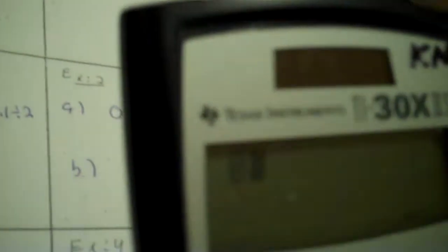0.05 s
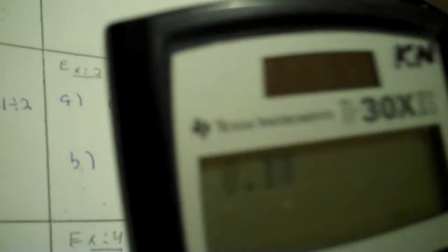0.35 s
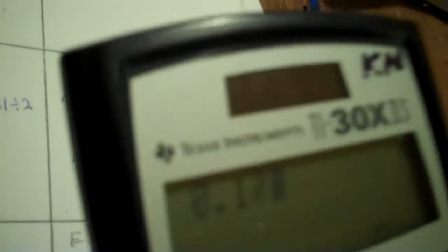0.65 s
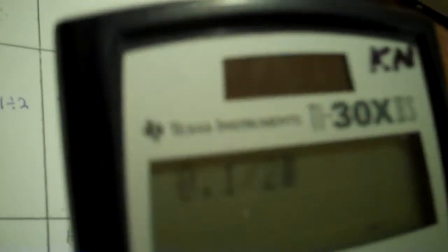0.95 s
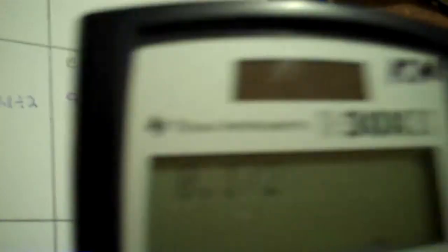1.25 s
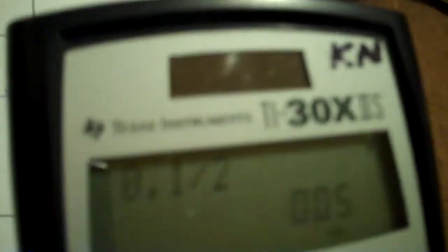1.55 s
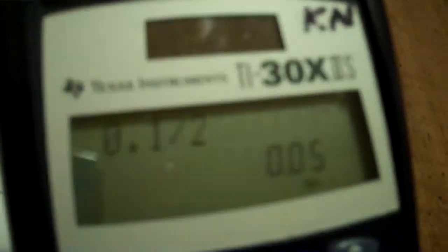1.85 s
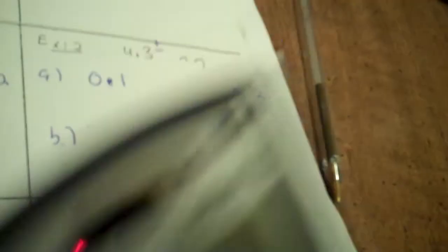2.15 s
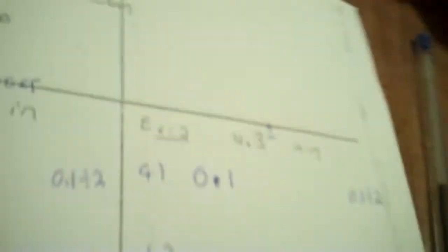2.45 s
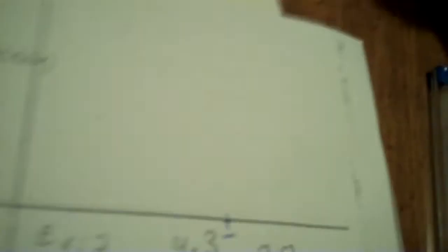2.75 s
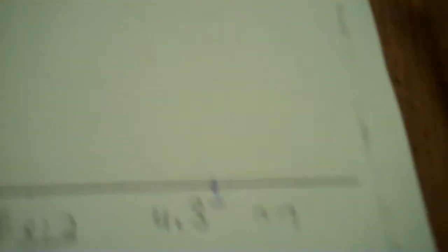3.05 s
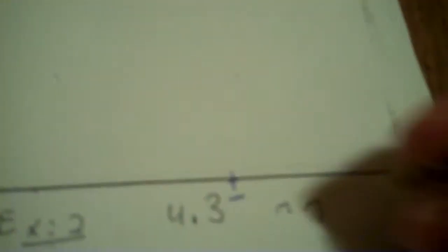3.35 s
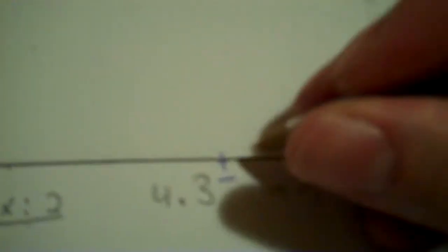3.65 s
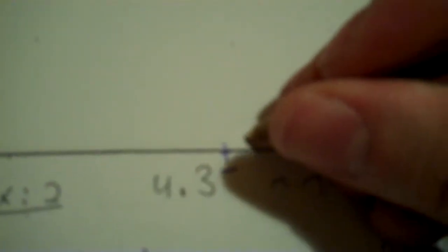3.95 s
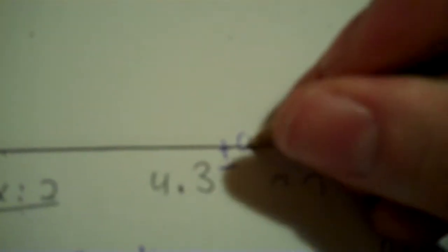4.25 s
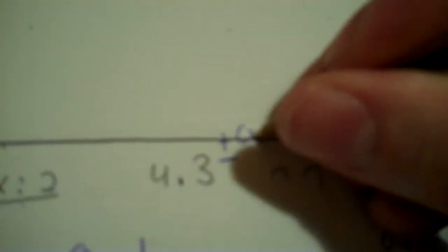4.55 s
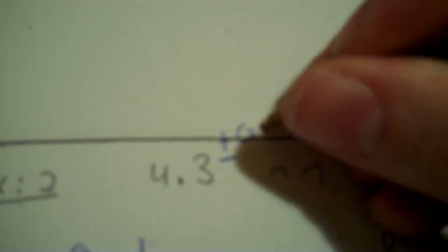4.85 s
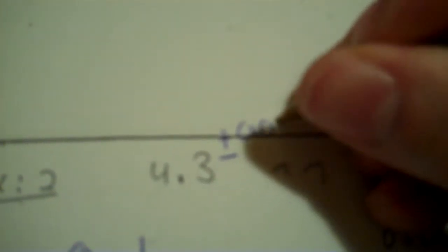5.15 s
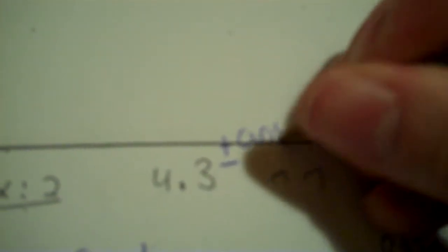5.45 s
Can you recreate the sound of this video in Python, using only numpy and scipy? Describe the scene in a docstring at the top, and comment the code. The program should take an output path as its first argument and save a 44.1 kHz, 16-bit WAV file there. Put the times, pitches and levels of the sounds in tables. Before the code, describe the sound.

Close to the microphone in a quiet room, fingers tap calculator keys with small, crisp clicks. Then comes the loudest sound: the hard plastic case lands on a wooden desk, rattling edge by edge with a thump that briefly overloads the microphone. Lighter knocks and ticks of a pen being handled follow, with a hand brushing paper, and finally the faint taps, scratches and thin squeak of writing.

```python
"""Plastic calculator keys click, close to the two microphone ports of a small camera in a quiet room.
Each key snaps and meets its stop. Then the calculator drops on the wooden desk: the hollow case
clatters edge by edge, the desk top rings and the loudest blows overload the microphone. A ballpoint
pen is picked up, a hand slides over the paper, and the tip ticks, scratches and sings as it writes."""
import sys
import numpy as np
from scipy import signal
from scipy.fft import rfft, irfft
from scipy.io import wavfile
from scipy.ndimage import uniform_filter1d

SR = 44100
rng = np.random.default_rng(int(sys.argv[2]) if len(sys.argv) > 2 else 0)


def store_wav(level_fs):
    """Save 16-bit WAV to argv[1]."""
    pcm = np.round(np.clip(np.atleast_2d(level_fs), -1, 1) * 32767)
    wavfile.write(sys.argv[1], SR, pcm.T.astype(np.int16))


N = 246449
TIME = np.arange(N) / SR
EDGE_HZ = 14450  # highest treble in the sound
LEAD = 48  # samples of padding before each click

# Small plastic parts heard close up. Each row: frequency in Hz, left gain in dB, right gain in dB.
PLASTIC_COLOUR = [(300, -25, -38), (810, -5, 2.5), (1330, 5.5, -0.5), (1580, -9.5, -0.5), (2400, 4.5, 6),
                  (3370, -2.5, 0), (4230, -1, -0.5), (5200, -2, -4), (6640, -2.5, -9.5), (7680, 2, -27),
                  (9400, -14.5, -28), (11800, -20, -39), (15600, -31, -13)]
# Something hard dragged over desk or paper. Each row: frequency in Hz, gain in dB.
DRAG_SPECTRUM = [(470, -40), (800, -18), (1680, -7), (2160, -3.5), (3800, 1), (6130, -6), (7600, -5),
                 (8370, -12.5), (9660, -19), (14000, -30)]


def amp(db):
    """Decibels to gain."""
    return 10 ** (np.asarray(db) / 20)


def unit(x):
    """Scales to rms 1."""
    return x / np.sqrt(np.mean(x ** 2) + 1e-20)


def read(points, hz, axis=1):
    """One column of a spectrum table, interpolated on a log-frequency axis."""
    table = np.array(points, float)
    return np.interp(np.log(hz + 1), np.log(table[:, 0] + 1), table[:, axis])


def sides(db):
    """Left and right gains that put the left port db above the right."""
    return amp(np.array([[.5], [-.5]]) * db)


def add(mix, s, sound):
    """Adds a stereo sound at s seconds."""
    part = mix[:, round(s * SR):][:, :sound.shape[1]]
    part += sound[:, :part.shape[1]]


def causal(db):
    """Response with the given gains that rings only after its cause."""
    log_gain = np.log(amp(np.concatenate([db, db[..., -2:0:-1]], -1)))
    return np.exp(np.conj(signal.hilbert(log_gain)))[..., :db.shape[-1]]


def noise(colour, same, balance_db=0):
    """Coloured stereo noise of rms 1; same is the correlation between the ports."""
    hz = np.fft.rfftfreq(N, 1 / SR)
    left, other = rfft(rng.standard_normal((2, N)))
    same = np.clip(same, -1, 1)
    pair = np.array([left, same * left + np.sqrt(1 - same ** 2) * other])
    return unit(irfft(pair * amp(read(colour, hz)) * sides(balance_db) * (hz < EDGE_HZ), N))


def chatter(decay, apart, size=4096, rise=0.0003, snap=2.5):
    """Spectrum of a sharp snap and its tiny rebounds; apart sets how much the two ports differ."""
    t = np.arange(size) / SR
    shared, own = np.split(rng.standard_normal((3, size)), [1])
    fade = np.exp(-t / max(decay, 1e-4)) * (1 - np.exp(-t / rise))
    own_share = np.minimum(apart * np.fft.rfftfreq(size, 1 / SR) / 4000, 1)
    spectrum = snap + rfft(shared * fade) + own_share * rfft(own * fade)
    # rebounds carry about equal energy in every broad band
    band_power = uniform_filter1d(abs(spectrum) ** 2, size=80, axis=1)
    return spectrum * causal(-10 * np.log10(band_power))


def blow(colour, apart, db, bass_db, treble_db, decay, spot_hz=None, spot_db=3.5, size=4096):
    """One contact coloured by the object; db is its level with the energy taken over 3 ms."""
    hz = np.fft.rfftfreq(size, 1 / SR)
    shape_db = np.array([read(colour, hz, axis=1), read(colour, hz, axis=2)])
    shape_db += read([(1200, bass_db), (3500, 0), (9000, treble_db)], hz)
    if spot_hz:  # the struck spot favours one resonance, 0.13 octaves wide
        shape_db += spot_db * np.exp(-(np.log2((hz + 1) / spot_hz) / 0.13) ** 2)
    shape_db -= 10 * np.log10(1 + (colour[0][0] / (hz + 10)) ** 2)  # a small object radiates little bass
    sound = irfft(chatter(decay, apart) * causal(shape_db))
    sound = np.roll(sound, LEAD, axis=1)[:, :size // 2]
    # one gain for both ports: the left hears more treble, so bright contacts lean left
    sound /= np.sqrt(np.linalg.norm(sound, axis=1).prod())
    return amp(db) * sound * np.sqrt(.003 * SR)


def ring(x, modes):
    """The dying modes of a struck object. Each row: frequency in Hz, gain in dB, t60 in seconds."""
    out = np.zeros_like(x)
    for hz, db, t60 in modes:
        radius = np.exp(-np.log(1000) / (t60 * SR))
        pole = radius * np.exp(2j * np.pi * hz / SR)
        out += 2 * amp(db) * signal.lfilter([1 - radius], [1, -pole], x + 1e-15).real
    return out


def clicks(rows, colour, modes, apart):
    """A series of contacts on one object, with its ringing."""
    out = np.zeros((2, N))
    for s, *tone in rows:
        add(out, s - LEAD / SR, blow(colour, apart, *tone))
    return out + ring(out, modes)


def hollow(x, spacing_hz, gain):
    """A click comes back within a millisecond, which ripples its spectrum and makes it hollow."""
    hz = np.fft.rfftfreq(N, 1 / SR)
    comb = 1 + gain * np.exp(-2j * np.pi * hz / spacing_hz)
    return irfft(rfft(x) * comb, N) / np.sqrt(1 + gain ** 2)


def swells(rows):
    """Pressure over time: each stroke rises and falls as a bell."""
    return sum(amp(db) * np.exp(-((TIME - s) / length) ** 2) for s, db, length in rows)


def rub(pressure, colour, grain_db, same):
    """Friction: hiss broken into millisecond grains by the surface."""
    # The top of the hiss leans left. Each row: frequency in Hz, left over right in dB.
    balance = [(2500, -1), (5000, -3), (8000, 21.5), (14000, 11)]
    balance_db = read(balance, np.fft.rfftfreq(N, 1 / SR))
    roughness = unit(uniform_filter1d(rng.standard_normal(N), size=90))
    return pressure * unit(noise(colour, same, balance_db) * amp(grain_db * roughness))


def scuffs(rows, colour, below_db, fade_s):
    """Surfaces rub softly just before and after each contact."""
    contacts = np.zeros(N)
    for s, db, *_ in rows:
        contacts[round(s * SR)] = amp(db + below_db)
    spread = np.exp(-abs(np.arange(-SR // 10, SR // 10) / SR) / fade_s)
    return signal.oaconvolve(contacts, spread, "same") * noise(colour, same=0.36)


def skids(rows, attack_s=0.0024, release_s=0.016):
    """Gritty friction on the desk: each skid grips quickly, holds and dies away."""
    pressure = np.zeros(N)
    for s, length, db in rows:
        grip = np.clip((TIME - s) / attack_s, 0, 1)
        release = np.exp(-np.maximum(TIME - s - length, 0) / release_s)
        pressure += amp(db) * grip * release
    return rub(pressure, DRAG_SPECTRUM, grain_db=2.0, same=0.52)


def room_noise(air_db=-55.5, hum_db=-76, hum_hz=61.3):
    """Room tone: steady air and microphone hiss, a low rush and a trace of mains hum."""
    # Air with hiss, and the rush. Each row: frequency in Hz, gain in dB.
    air_colour = [(18, -41), (30, -23.5), (65, -13.5), (91, -28), (131, -4.5), (230, -2.5), (367, -8.5),
                  (396, -2.5), (554, -11.5), (630, -7), (775, -17), (952, -9.5), (1350, -12.5),
                  (1720, -17.5), (14300, -27)]
    rush_colour = [(100, -26), (160, -12.5), (270, 9), (500, -3), (820, 2.5), (1400, -19.5), (2500, -40)]
    # How alike the air is at the two ports. Each row: frequency in Hz, correlation.
    air_likeness = [(60, -0.02), (180, 1), (540, 0.91), (1640, 0.42), (4950, -0.05), (14900, -0.23)]
    # The rush, louder near the desk top. Each row: time in seconds, level in dB.
    rush_levels = [(0, -61.5), (1.7, -65), (2.3, -61.5), (3.1, -61.5), (4, -59.5), (4.6, -59), (5.59, -59)]
    hz = np.fft.rfftfreq(N, 1 / SR)
    air = amp(air_db) * noise(air_colour, read(air_likeness, hz))
    rush = amp(np.interp(TIME, *np.transpose(rush_levels))) * noise(rush_colour, same=0.95)
    return air + rush + amp(hum_db) * np.sin(2 * np.pi * hum_hz * TIME)


def room_echo(x, early_db=-18.5, early_decay_s=0.0081, onset_s=0.0031, blur_octaves=0.13):
    """A few reflections, then a diffuse tail that arrives from all sides and so has a smooth spectrum."""
    # Length of the tail. Each row: frequency in Hz, t60 in seconds.
    tail_t60 = [(150, 0.83), (700, 0.92), (2000, 0.61), (7500, .46), (13000, .28)]
    # Strength of the tail. Each row: frequency in Hz, gain in dB.
    tail_gain = [(100, -32), (400, -7), (1400, -14), (3500, -19.5), (7500, -22), (12000, -25.5)]
    # First reflections at the microphone. Each row: delay in seconds, gain.
    reflections = [(.0098, 0.043), (0.0115, 0.058), (0.013, 0.061)]
    frames = dict(fs=SR, nperseg=256, noverlap=192)
    hz, t, spectra = signal.stft(x, **frames)
    octave = np.log2(hz + 1)
    blur = np.exp(-((octave[:, None] - octave) / blur_octaves) ** 2)
    power = (blur / blur.sum(1, keepdims=True)) @ abs(spectra) ** 2
    age = t[t < 1]
    rate = 2 * np.log(1000) / read(tail_t60, hz)[:, None]
    late = amp(read(tail_gain, hz)[:, None]) ** 2 * rate * np.exp(-rate * age)
    early = amp(early_db) ** 2 / early_decay_s * np.exp(-age / early_decay_s)
    response = (late + early) * np.minimum(age / onset_s, 1) ** 2 * t[1]
    energy = abs(signal.fftconvolve(power, response[None], axes=-1)[..., :len(t)])
    diffuse = rng.standard_normal((2, N)) + rng.standard_normal(N)  # the ports share half the power
    scatter = signal.stft(diffuse, **frames)[2]
    echo = signal.istft(scatter / scatter.std() * np.sqrt(energy), **frames)[1][:, :N]
    for s, gain in reflections:
        add(echo, s, gain * x)
    return echo


def hand_slide():
    """The hand brushes over plastic and paper with a soft, grainy hiss."""
    # Each row: middle of the stroke in seconds, level in dB, half length in seconds.
    strokes = [(1.195, -48.5, 0.012), (1.315, -52, 0.035), (2.265, -57, 0.054), (2.38, -57.5, 0.049),
               (2.535, -45.5, 0.039), (2.98, -44.5, 0.22), (3.6, -46.5, 0.2), (3.9, -58, 0.039),
               (4.3, -65, 0.27)]
    # The hiss of the hand. Each row: frequency in Hz, gain in dB.
    colour = [(530, -37.5), (900, -10.5), (1600, -6.5), (1860, -2.5), (2180, -1.5), (4870, 1), (6270, -4.5),
              (7440, -2.5), (11300, -19.5), (14000, -22.5)]
    return rub(swells(strokes), colour, grain_db=1.5, same=0.11)


def writing(tip_chatter_s=0.00063, ping_chatter_s=0.0005):
    """The tip ticks and scratches, the refill pings, and friction at the ball makes the pen sing."""
    # The tip meets the paper. Each row: start in seconds, then level, bass and treble in dB.
    taps = [(3.751, -40, 24, 8.5), (4.445, -35.5, -22, -7), (4.4783, -46, -11, -30),
            (4.7952, -35.5, 10.5, -1), (4.8016, -42.5, 23.5, -5), (4.88, -47.5, -3, -23),
            (4.906, -46, 0, 6), (5.0895, -50.5, -5, 4), (5.1969, -41, -3, -4), (5.2316, -42, 14, 2),
            (5.3213, -38.5, -11, -24)]
    # The tip at the microphone. Each row: frequency in Hz, left and right gain in dB.
    tip_colour = [(500, -23, -32), (1510, -25, -36), (2300, -5.5, -3.5), (3300, -6.5, -10), (4700, 4.5, 6),
                  (6500, 12.5, 2), (7600, 7.5, -13), (8230, 11, -14), (9860, -5, -20), (15000, -14, -19)]
    # The refill shifts in the barrel. Each row: start in seconds, level in dB.
    shifts = [(4.0627, -48.5), (4.2385, -51.5), (4.395, -58)]
    # Its fine ring. Each row: frequency in Hz, gain in dB, t60 in seconds.
    refill_modes = [(3000, 20, 0.05), (8040, 21.4, 0.0072)]
    # Pen strokes. Each row: middle in seconds, level in dB, half length in seconds.
    scratch_strokes = [(3.836, -48, 0.015), (4.207, -57, 0.0058), (4.808, -48, 0.0089), (4.844, -51, .016),
                       (5.243, -53.5, 0.023)]
    singing_strokes = [(5.537, -59.5, 0.27)]
    # Narrow resonances of the singing pen. Each row: frequency in Hz, gain in dB.
    squeak_colour = [(1500, -21), (2550, -4), (2920, 0.5), (3350, -20), (3900, -4.5), (4600, -21),
                     (8100, -15.5), (9500, -27)]
    touches = [(*row, tip_chatter_s) for row in taps]
    tip = clicks(touches, tip_colour, modes=[], apart=1.0)
    tip += scuffs(touches, tip_colour, below_db=-26.5, fade_s=0.0089)
    refill_contacts = [(s, db, 0, 0, ping_chatter_s) for s, db in shifts]
    pings = clicks(refill_contacts, PLASTIC_COLOUR, refill_modes, apart=0.92)
    scratch = rub(swells(scratch_strokes), DRAG_SPECTRUM, grain_db=4.0, same=0.3)
    squeak = swells(singing_strokes) * noise(squeak_colour, same=0.31)
    return tip + scratch + pings + squeak


def pen_handling(tick_bass_db=0.5, tick_chatter_s=0.00086):
    """The pen barrel knocks and scrapes on the desk; plastic shifting in the fingers ticks brightly."""
    # Each row: start in seconds, then relative level, bass and treble in dB, chatter decay in seconds.
    barrel_knocks = [(2.9076, -22, 13, -7, 0.0038), (2.9535, -18.5, 11.5, 14, 0.00084),
                     (3.0015, -21, -5, -26, 0.002), (3.0174, -11, -9.5, 2.5, 0.0007),
                     (3.0217, -20, -5, -11, .001)]
    # Each row: start and length in seconds, relative level in dB.
    barrel_scrapes = [(2.899, .036, -31.5), (2.946, .034, -31.5), (3.021, 0.013, -28)]
    # The barrel's ring. Each row: frequency in Hz, gain in dB, t60 in seconds.
    barrel_modes = [(2820, 0, 0.11), (3950, 3, .09), (5190, -2, .08), (7407, 0, .08), (8460, -11, .08),
                    (9560, 3, .08)]
    # Each row: start in seconds, relative level and treble in dB.
    finger_ticks = [(1.777, -51, -6), (2.2393, -46, -18), (2.3403, -48.5, -11), (2.495, -39, 5),
                    (3.106, -40.5, 1), (3.184, -43, 4), (3.215, -44, -3), (3.24, -40, 0), (3.3186, -41, 8),
                    (3.3505, -45.5, 19), (3.3707, -32, 10), (3.3904, -35, 17), (3.421, -34, 6.5),
                    (3.7944, -49, 3), (3.878, -48, -9)]
    # Barrel and ticks at the microphone. Each row: frequency in Hz, left and right gain in dB.
    barrel_colour = [(306, -14, -13), (1002, -29, -25), (1970, -23, -26), (2850, -13, -10),
                     (4080, -10, -5.5), (5250, -1, -7.5), (6860, -3.5, -12), (7260, 1, -18),
                     (9750, -7, -32), (10600, -29, -35), (12740, -16.5, -47), (15000, -30, -38)]
    tick_colour = [(498, -15.5, -14), (2010, -17, -11.5), (4166, -7.5, -2), (6300, -6.5, -6.5),
                   (7260, 11, -10.5), (8600, -2, -18.5), (12550, -10.5, -25.5), (15000, -15, -26.5)]
    knocks = clicks(barrel_knocks, barrel_colour, barrel_modes, apart=0.74)
    shifts = [(s, db, tick_bass_db, treble_db, tick_chatter_s) for s, db, treble_db in finger_ticks]
    ticks = clicks(shifts, tick_colour, modes=[], apart=0.9)
    scrape = skids(barrel_scrapes)
    barrel = hollow(knocks + scrape + ring(scrape, barrel_modes), spacing_hz=1374, gain=0.58)
    return amp(-2.0) * barrel + amp(-0.5) * ticks


def thumps():
    """Low thumps, mostly left: soft knocks, and a deep one as the loudest blow overloads the microphone."""
    # Each row: start in seconds, level in dB, frequency in Hz, decay in seconds.
    pulses = [(1.172, -48.5, 670, 0.0034), (2.424, -39, 110.6, 0.0092), (2.6273, -7.5, 68.44, 0.0026),
              (2.67, -29.5, 100, 0.0032), (2.904, -42, 190, 0.017)]
    out, t = np.zeros((2, N)), np.arange(SR // 8) / SR
    for s, db, hz, decay in pulses:
        thump = amp(db) * np.exp(-t / decay) * np.sin(2 * np.pi * hz * t)
        add(out, s, sides(db=18) * thump)
    return out


def desk_ring(flat_landing_s=2.627):
    """The wooden desk top rings once the case falls flat."""
    # Each row: frequency in Hz, level in dB, t60 in seconds.
    modes = [(340, -30, 0.57), (437, -30, .45), (594, -31.5, .35), (656.6, -32, .35), (737, -26.5, .48)]
    out, t = np.zeros((2, N)), np.arange(SR) / SR
    for hz, db, t60 in modes:
        tone = amp(db) * np.exp(-np.log(1000) * t / t60) * np.sin(2 * np.pi * hz * t)
        add(out, flat_landing_s, sides(db=-0.5) * tone)
    return out


def key_click(s, db, bass_db, treble_db, decay, spot_hz, medium_db=-34, spot_db=5):
    """One contact of a key: a firm click is crisp; a soft one is rounder and chatters longer."""
    softer_db = medium_db - db
    bass_db += 0.65 * softer_db
    decay *= amp(0.29 * softer_db)
    return s, db, bass_db, treble_db, decay, spot_hz, spot_db


def keypad(chatter_s=0.0011, duller_db=4):
    """Close to the microphone a key snaps, then meets its stop with a duller click; fingertips brush."""
    # A key goes down or comes up. Each row: start in seconds, relative snap level in dB, gap in
    # seconds, relative stop level, bass and treble in dB, the key's own resonance in Hz.
    moves = [(0.0795, -29, 0.017, -24, -2, 15.5, 2690), (0.1808, -42, 0.012, -40, -11, 2.5, 2670),
             (0.2987, -33.5, 0.014, -41.5, -10, 0, 2620), (0.4057, -39.5, 0.0088, -35.5, -4, 9, 3340),
             (0.457, -43, 0.0078, -45, -12, 0, 2350), (0.474, -46, 0.013, -52, -14, 0, 2500),
             (.543, -27.5, 0.019, -38.5, -6, 10, 2870), (0.6825, -39, 0.016, -43.5, 3, 12.5, 3220),
             (0.7447, -28.5, 0.013, -54, 1, 10.5, 3930), (0.832, -22.5, 0.017, -55, -6, 10.5, 3500),
             (.948, -40.5, 0.012, -40, 0.5, 8.5, 2200), (1.0705, -26, 0.011, -35.5, -10, 15.5, 5800),
             (1.172, -39, 0.0042, -28.5, 4.5, 10, 5960), (1.2911, -40, 0.028, -40.5, 8.5, 21, 2380)]
    # The keys' brief ring. Each row: frequency in Hz, gain in dB, t60 in seconds.
    modes = [(2450, -13, 0.0049), (7500, -22, .025)]
    contacts = []
    for s, db, gap, stop_db, bass_db, treble_db, hz in moves:
        contacts.append(key_click(s, db, bass_db, treble_db, chatter_s, hz))
        contacts.append(key_click(s + gap, stop_db, bass_db, treble_db - duller_db, 0.96 * chatter_s, hz))
    snaps = amp(-3.0) * clicks(contacts, PLASTIC_COLOUR, modes, apart=1.0)
    return snaps + scuffs(contacts, PLASTIC_COLOUR, below_db=-29.5, fade_s=0.014)


def clatter(follow_decays=1.1, follow_db=-0.5):
    """The hollow case bounces and skids: at each landing one edge strikes and the other follows."""
    # Each row: start in seconds, then level, bass and treble in dB, chatter decay in seconds,
    # resonance of the struck edge in Hz.
    landings = [(2.4259, -9.5, 1.5, 2, 0.0014, 3668), (2.561, -2, 3, 3, 0.0014, 1480),
                (2.5983, -11.5, 5, -0.5, 0.0012, 1280), (2.624, 0.5, -0.5, 2.5, .003, 4330),
                (2.6725, -11.5, -0.5, 3, 0.00119, 3320), (2.7974, -30, -2.5, -8, 0.0062, 3360),
                (2.827, -26, -17, -4.5, .0012, 3130)]
    # The case at the microphone. Each row: frequency in Hz, left and right gain in dB.
    colour = [(172, -13, -17), (487, -7, -9), (710, -4.5, -4.5), (1030, -8, -7.5), (1340, -0.5, -1),
              (2060, -11, -9.5), (2610, -3.5, -6), (3040, -11.5, -8.5), (3420, -5, -1), (4030, -10.5, -10),
              (4758, -7, -4.5), (5800, -8, -12), (7400, 0.5, -22), (9400, -11, -32), (15300, -18.5, -37.5)]
    # Its ring. Each row: frequency in Hz, gain in dB, t60 in seconds.
    modes = [(716, -8, 0.13), (1212, -3, .33), (1380, -4, .11), (1607, -6, 0.12), (2550, -5.5, .04),
             (3440, -3.5, .035), (7530, -5.5, .06)]
    # Skids between bounces. Each row: start and length in seconds, level in dB.
    slips = [(2.566, .009, -26), (2.652, .026, -30.5)]
    other_edge = [(s + follow_decays * decay, db + follow_db, bass_db, treble_db, decay, hz)
                  for s, db, bass_db, treble_db, decay, hz in landings]
    return clicks(landings + other_edge, colour, modes, apart=0.9) + skids(slips)


def scene():
    """Calculator, pen and paper on one desk; the clicks echo in the room, the pen barrel a little less."""
    keys, case, pen, tip = keypad(), clatter(), pen_handling(), writing()
    hand = hand_slide()
    echo = room_echo(keys + case + amp(-3.5) * pen + tip)
    return keys + case + thumps() + desk_ring() + pen + tip + hand + echo + room_noise()


def record(dry):
    """The loudest blows clip at full scale, and the highest treble is cut."""
    clipped = np.clip(dry, -1, 1)
    lowpass = signal.firwin(255, EDGE_HZ, window=("kaiser", 8), fs=SR)
    return signal.oaconvolve(clipped, lowpass[None], "same")


dry = scene()
out = record(dry)
store_wav(out)
```